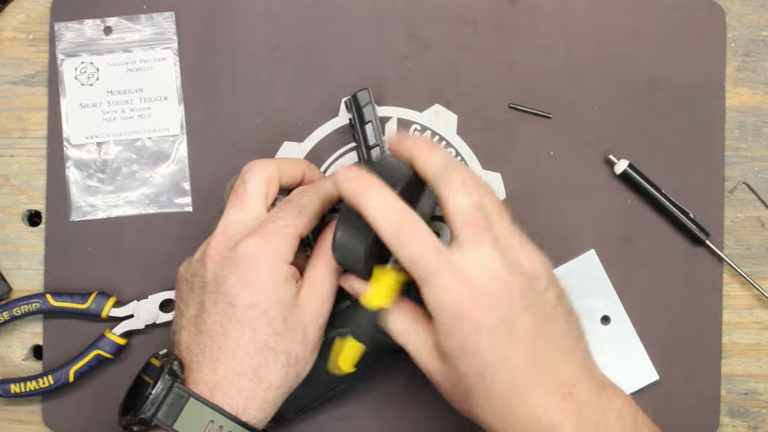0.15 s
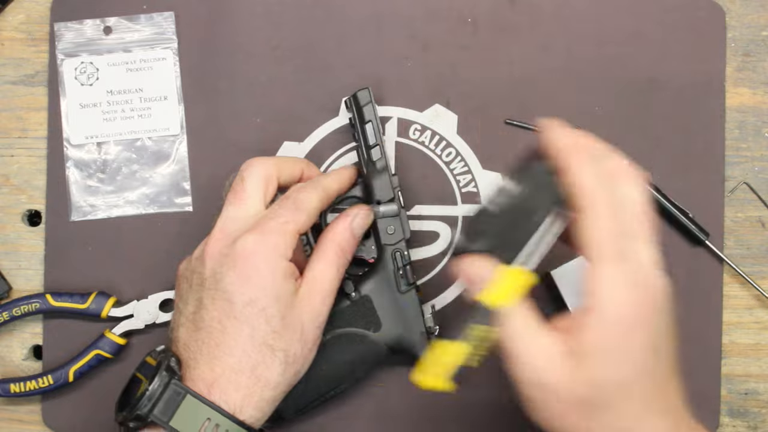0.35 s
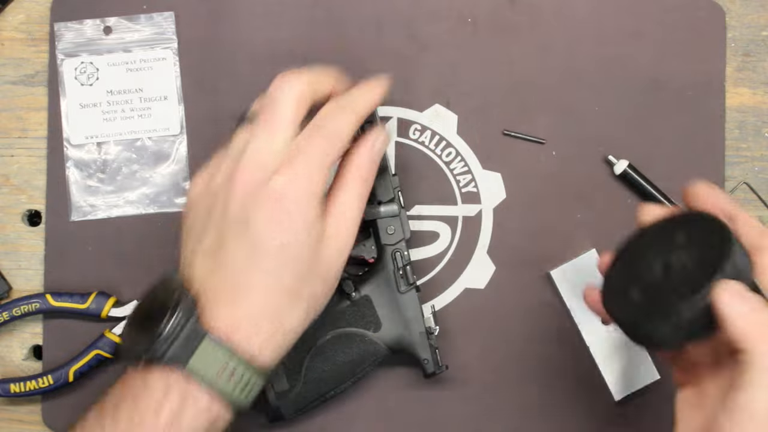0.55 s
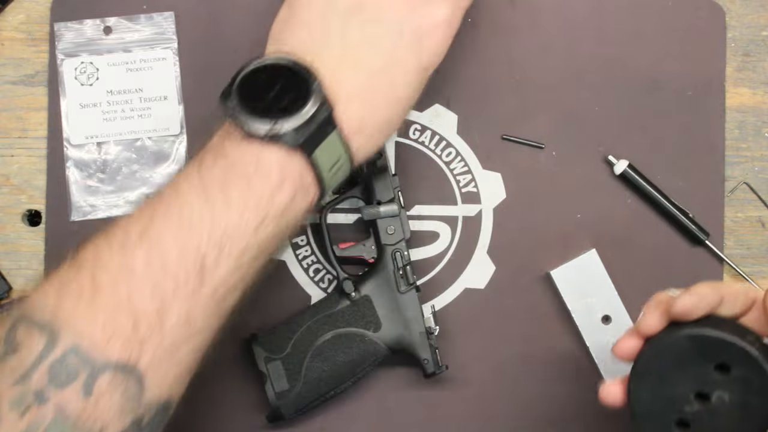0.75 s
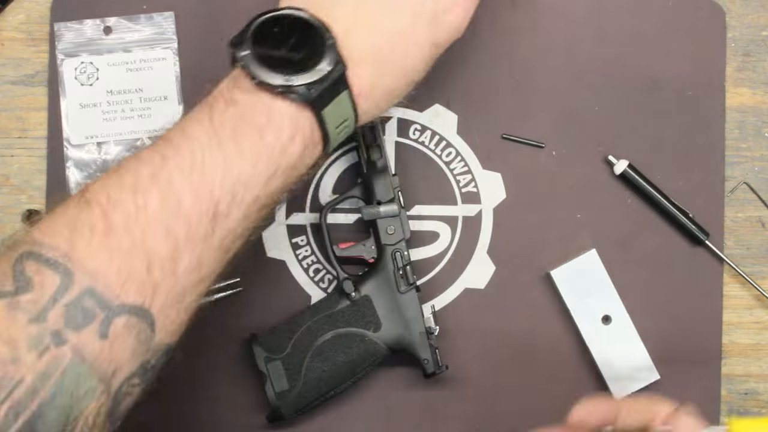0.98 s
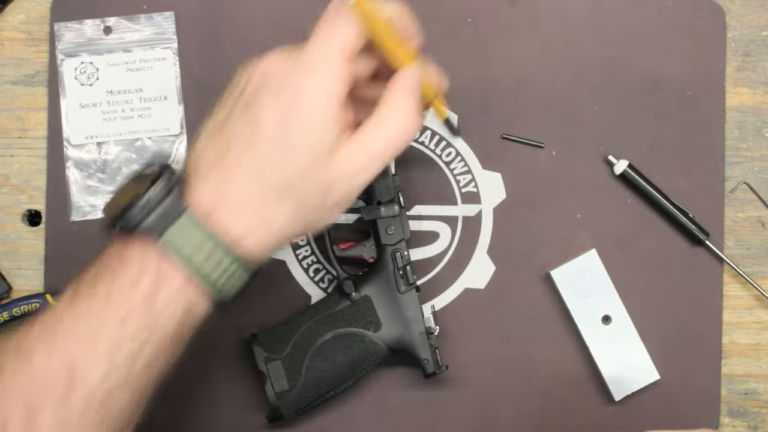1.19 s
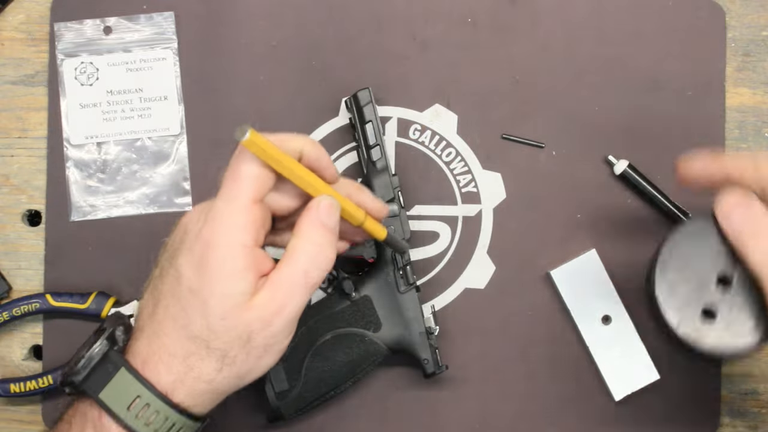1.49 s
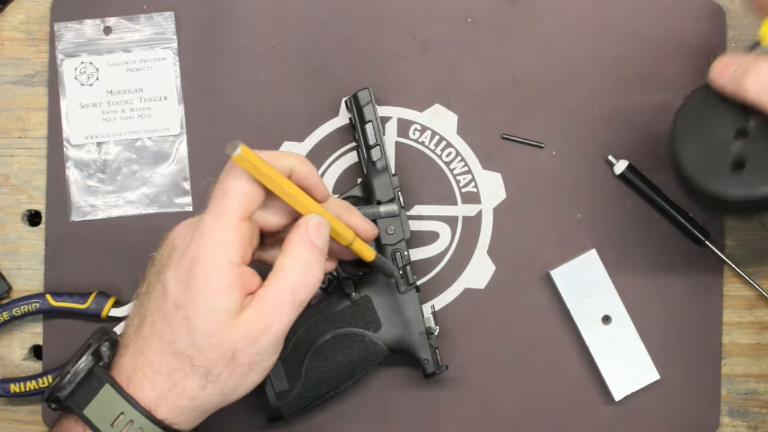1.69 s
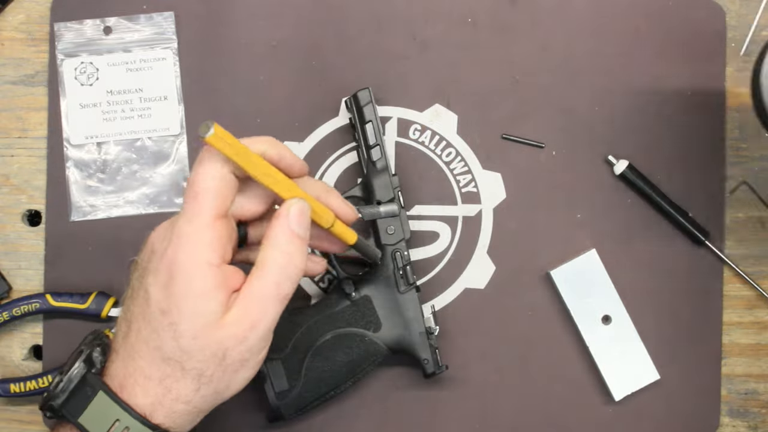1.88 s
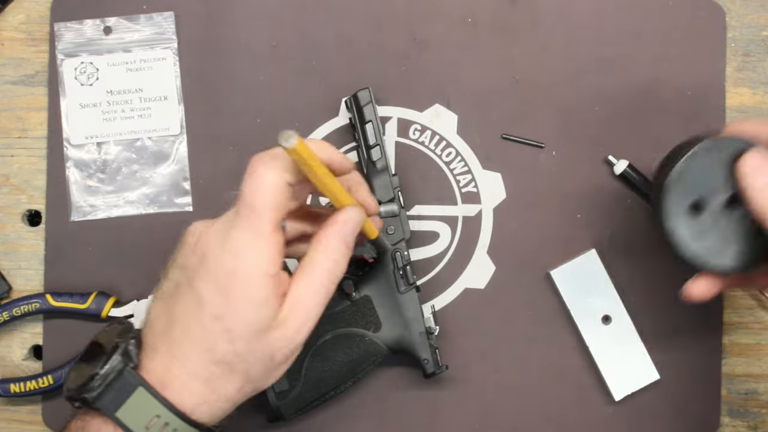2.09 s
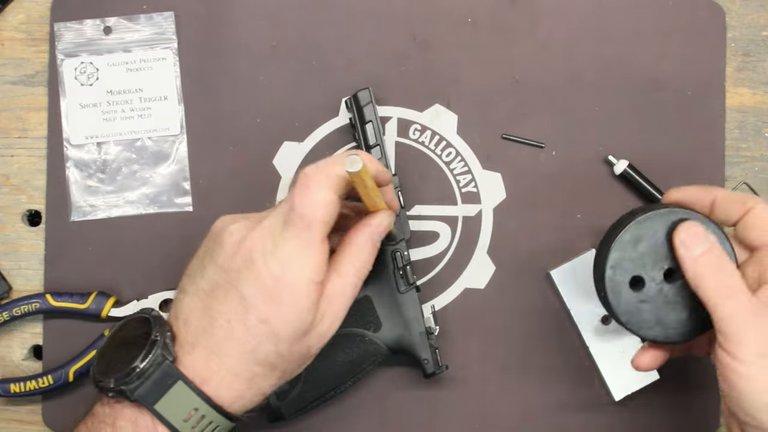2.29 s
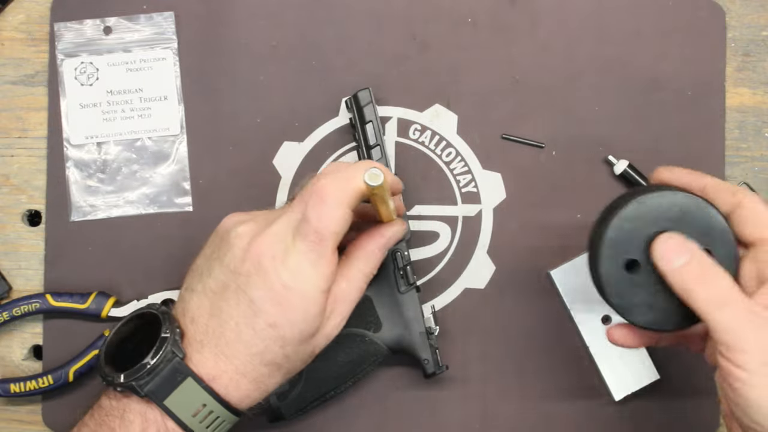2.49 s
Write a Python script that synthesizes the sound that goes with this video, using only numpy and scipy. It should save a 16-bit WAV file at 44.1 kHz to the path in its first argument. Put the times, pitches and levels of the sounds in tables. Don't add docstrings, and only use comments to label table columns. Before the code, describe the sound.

Tapping on a steel pin with a hard puck, close in a small room with faint fan hum. An earlier blow dies away at 0 s; a loud, clipped knock hits at 0.25, followed by ticks and light clinks near 0.5. A forearm rubs and a tool scrapes around 0.9-1.3. Soft thuds come at 1.75, the puck lands hard at 1.94, bounces at 2.08, 2.2 and 2.34, then steel clinks sharply at 2.39.

```python
import sys
import numpy as np
from scipy import signal
from scipy.fft import rfft, irfft
from scipy.io import wavfile
from scipy.ndimage import uniform_filter1d, map_coordinates

SR = 44100
rng = np.random.default_rng(int(sys.argv[2]) if len(sys.argv) > 2 else 0)


def gain_from_db(level_db):
    decades = np.asarray(level_db, float) / 20
    return 10 ** decades


def store_wav(level_fs):
    pcm = np.round(np.clip(np.atleast_2d(level_fs), -1, 1) * 32767)
    wavfile.write(sys.argv[1], SR, pcm.T.astype(np.int16))


N = 116865

# start_s, peak_db
TAPS = [
    (-.11, 12.5),
    (0.2461, 13),
]
LAST_TAP_S = TAPS[1][0]
LANDING_S = 1.9427
AIR_TOP_HZ = 15800


def unit(x):
    return x / np.sqrt(np.mean(x ** 2) + 1e-20)


def along(points, hz):
    point_hz, value = np.transpose(points)
    return np.interp(np.log(hz + 1), np.log(point_hz + 1), value)


def curve(rows):
    time_s, level_db = np.transpose(rows)
    return gain_from_db(np.interp(np.arange(N) / SR, time_s, level_db))


def wobble(rate_hz):
    return map_coordinates(rng.standard_normal(N // 64), [np.arange(N) * rate_hz / SR])


def noise(colour, size, tilt_db=0, peaks=()):
    tilt_floor_hz = 400
    hz = np.fft.rfftfreq(size, 1 / SR)
    level_db = along(colour, hz)
    level_db = level_db + tilt_db * np.log2(np.maximum(hz, tilt_floor_hz) / 2000) / 2
    for peak_hz, width_hz, boost_db in peaks:
        level_db = level_db + boost_db / (1 + ((hz - peak_hz) / width_hz) ** 2)
    spectrum = rfft(rng.standard_normal(size)) * gain_from_db(level_db) * (hz < AIR_TOP_HZ)
    return unit(irfft(spectrum, size))


def add(out, start_s, x):
    i = round(start_s * SR)
    x = x[max(-i, 0):][:N - max(i, 0)]
    out[max(i, 0):][:len(x)] += x


def blow(colour, dies, tilt_db, room_db, rise_s, peaks=(), crack_db=-90):
    # pitch_hz, t60_s
    room_dies = [(100, 0.52), (500, 0.39), (2000, 0.39), (6000, 0.29), (14000, 0.23)]
    # pitch_hz, level_db_per_hz
    crack_colour = [(200, -34), (2000, -26), (15500, 13)]
    crack_t60_s = 0.002
    t = np.arange(1 << 15) / SR
    source = noise(colour, size=len(t), tilt_db=tilt_db, peaks=peaks)
    hz, frame_s, z = signal.stft(source, SR, nperseg=128, noverlap=96)
    body_fade = gain_from_db(-60 * frame_s / along(dies, hz)[:, None])
    room_fade = gain_from_db(room_db - 60 * frame_s / along(room_dies, hz)[:, None])
    body = signal.istft(z * (body_fade + room_fade), SR, nperseg=128, noverlap=96)[1][:len(t)]
    crack = noise(crack_colour, size=len(t), tilt_db=2 * tilt_db)
    return body * (1 - np.exp(-t / rise_s)) + gain_from_db(crack_db - 60 * t / crack_t60_s) * crack


def ring(modes, length_s, rough_hz=0):
    t = np.arange(round(length_s * SR)) / SR
    out = np.zeros(len(t))
    for pitch_hz, level_db, t60_s in modes:
        steps = uniform_filter1d(rng.standard_normal(len(t)), size=96)
        steps = uniform_filter1d(steps, size=96)
        walk = np.cumsum(steps) * np.sqrt(rough_hz / (2 * np.pi * SR))
        out += gain_from_db(level_db - 60 * t / t60_s) * np.sin(2 * np.pi * (pitch_hz * t + walk))
    return out


def background():
    # pitch_hz, level_db_per_hz
    air_colour = [(15, -47), (25, -12), (101, -10), (221, -28), (322, -4.5), (421, -13.5), (1110, -16.5),
                  (1380, -17), (15500, -37)]
    # pitch_hz, width_hz, level_db
    fan = [(177, 44, -51), (350, 230, -53), (1137, 114, -51), (9920, 230, -63)]
    # time_s, gain_db
    gain_rows = [(0, -3), (.2, -1), (.3, -0.5), (.6, -6), (.75, -4), (1.08, 0.5), (1.9, -1.5), (2.0, -2.5),
                 (2.3, -1), (2.45, -1.5), (2.58, -1), (2.65, 0)]
    air_db, whine_hz, whine_db = -42.5, 9959, -59
    treble_hz, treble_ducks = 3000, 4
    hz, hum, gain = np.fft.rfftfreq(N, 1 / SR), np.zeros(N), curve(gain_rows)
    for pitch_hz, width_hz, level_db in fan:
        band = np.exp(-((hz - pitch_hz) / width_hz) ** 2)
        hum += gain_from_db(level_db) * unit(irfft(rfft(rng.standard_normal(N)) * band, N))
    whine = gain_from_db(whine_db + 2.0 * wobble(15)) * np.sin(2 * np.pi * whine_hz * np.arange(N) / SR)
    air = rfft(gain_from_db(air_db - 1.5 + 0.072 * wobble(8.0)) * noise(air_colour, size=N))
    air = air * (hz < AIR_TOP_HZ) / (1 + (40 / (hz + 1)) ** 4)
    treble = 1 / (1 + (treble_hz / (hz + 1)) ** 2)
    low = irfft(air * (1 - treble), N) + hum
    high = irfft(air * treble, N) + whine
    return gain * low + gain ** treble_ducks * high


def sleeve():
    # time_s, level_db
    speed = [(1.065, -80), (1.08, -45), (1.2, -50.5), (1.275, -54), (1.31, -74)]
    # pitch_hz, level_db_per_hz
    colour = [(4000, -20), (10000, 3), (15500, -7)]
    return curve(speed) * noise(colour, size=N)


def forearm_slide():
    # time_s, level_db
    speed = [(.6, -65.5), (.69, -50), (.9, -46.5), (1.055, -61), (1.075, -38.5), (1.19, -45.5),
             (1.25, -37.5), (1.3, -47.5), (1.36, -45), (1.6, -52.5), (1.9, -53), (2.1, -72)]
    # pitch_hz, level_db_per_hz
    colour = [(880, -17), (1500, -4), (2440, -3.5), (3250, -0.5), (4610, -3.5), (9700, -8.5),
              (15500, -17.5)]
    lumps = gain_from_db(1 * wobble(40.46))
    return curve(speed) * unit(lumps * noise(colour, size=N))


def tool_scrape():
    # time_s, level_db
    pressure = [(.91, -59), (.95, -30.5), (1.0, -30), (1.05, -40), (1.12, -37), (1.2, -100)]
    # pitch_hz, level_db_per_hz
    colour = [(47, -33), (80, -26), (119, -9), (485, -1), (693, -5.5), (1270, -9), (12000, -33.5),
              (15600, -67), (22000, -120)]
    lumps = gain_from_db(2.7 * wobble(69.84))
    return curve(pressure) * unit(lumps * noise(colour, size=N))


def squeak():
    # time_s, pitch_hz, level_db
    glide = [(.8, 10000, -80), (.84, 10000, -58), (.91, 10600, -55), (.945, 10350, -56), (1.01, 10300, -80)]
    time_s, hz, level_db = np.transpose(glide)
    pitch_hz = np.interp(np.arange(N) / SR, time_s, hz) + 30 * wobble(60)
    return curve(np.transpose([time_s, level_db])) * np.sin(2 * np.pi * np.cumsum(pitch_hz) / SR)


def stand_sways():
    # start_s, level_db
    thumps = [(0.849, -35), (0.951, -26), (1.75, -21), (2.09, -62), (2.411, -30)]
    stand_hz, t60_s, rise_s = 55.5, .2, 0.0084
    out, t = np.zeros(N), np.arange(SR // 2) / SR
    sway = (1 - np.exp(-t / rise_s)) * np.sin(2 * np.pi * stand_hz * t)
    for start_s, level_db in thumps:
        add(out, start_s, gain_from_db(level_db - 60 * t / t60_s) * sway)
    return out


def ticks():
    # start_s, peak_db, brightness_db
    contacts = [(.018, -45, 5), (.069, -43, 5), (0.097, -33, -10), (.138, -44, 8), (.195, -33, 7),
                (.228, -47, 8), (.236, -44, 0), (.2645, -24, 0), (.287, -29, 0), (.312, -18, 6),
                (.62, -39, 6), (.897, -34, -3), (.956, -27, -12), (.987, -32, -8), (1.012, -42, 12),
                (1.026, -27, 17), (1.555, -29, -3), (1.7385, -19, -43), (1.786, -27, -40),
                (1.931, -14, -27), (2.1014, -42, 5), (2.242, -27, 3), (2.2655, -20, 11), (2.598, -30, -45)]
    # pitch_hz, level_db_per_hz
    colour = [(1500, -32), (5000, 11), (9000, 2), (14000, -4)]
    out = np.zeros(N)
    for start_s, peak_db, bright_db in contacts:
        add(out, start_s, gain_from_db(peak_db - 11.5) * blow(colour, [(8000, 0.02)], bright_db, -58, 0.00021))
    return out


def thuds():
    # start_s, peak_db, pitch_hz
    contacts = [(.405, -22.5, 350), (.948, -36, 494), (0.965, -32, 440), (0.986, -23, 505),
                (1.0255, -15, 360), (1.0269, -19.5, 743), (1.044, -23, 450), (1.740, -11.5, 240.6),
                (1.762, -17.5, 262), (1.805, -28.5, 340), (1.931, -16.5, 206), (2.102, -13.5, 348)]
    # pitch_hz, level_db_per_hz
    colour = [(35, -51), (60, -30), (181, -3.5), (257, 0), (606, -15), (842, -29), (1080, -22.5),
              (8000, -50), (10400, -74), (17600, -120)]
    # pitch_hz, t60_s
    dies = [(100, 0.08), (500, 0.19), (4000, 0.012)]
    note_t60_s, note_db = 0.077, -2.5
    out = np.zeros(N)
    for start_s, peak_db, pitch_hz in contacts:
        add(out, start_s, gain_from_db(peak_db - 12) * blow(colour, dies, 3.7, -9, 0.00076, crack_db=-28))
        add(out, start_s, ring([(pitch_hz, peak_db + note_db, note_t60_s)], .5))
    return out


def clinks():
    # start_s, peak_db, brightness_db, mode_1_hz, mode_2_hz
    touches = [(0.468, -28, 0, 3400, 3900), (0.475, -20.5, 11, 7500, 4180), (.479, -23, 0, 3400, 7100),
               (0.4977, -21, 0, 3480, 8510), (.503, -38, 1, 3440, 8800), (1.067, -22, -11.5, 1945, 7100),
               (1.078, -21.5, 1, 6600, 2940), (1.9549, -11.5, 1, 6400, 8300),
               (2.2188, -11.5, -5, 4170, 7360), (2.3632, -5.5, -11.5, 2555, 4690),
               (2.368, -10, -18, 2300, 3900), (2.392, 5.5, 3, 3280, 1443)]
    # pitch_hz, level_db_per_hz
    colour = [(100, -59), (900, -12), (1500, -3), (3300, 2), (7000, -5), (15500, -21.5)]
    # pitch_hz, width_hz, boost_db
    steel = [(1354, 61, 1.5), (5170, 110, -5), (8700, 270, 5.5)]
    # pitch_hz, t60_s
    dies = [(1000, 0.041), (4000, 0.017), (12000, 0.009)]
    # pitch_hz, level_db, t60_s
    bar = [(2930, -22, 0.15), (3270, -15, 0.22), (3420, -17, 0.3), (3600, -21, 0.3), (4880, -28, 0.35),
           (5900, -28, 0.28)]
    main_width_hz, main_boost_db = 250, 7
    main_ring_db, main_t60_s = -9.5, 0.031
    out = np.zeros(N)
    for start_s, peak_db, bright_db, *modes_hz in touches:
        peaks = steel + [(hz, main_width_hz * hz / 3500, main_boost_db) for hz in modes_hz]
        knock = blow(colour, dies, bright_db, -21.5, 0.000067, peaks, crack_db=-23)
        add(out, start_s, gain_from_db(peak_db - 4.5) * knock)
        notes = [(hz, min(peak_db, 0) + main_ring_db, main_t60_s) for hz in modes_hz]
        add(out, start_s, ring(notes, .1, rough_hz=150))
    add(out, touches[-1][0], ring(bar, .5, rough_hz=109))
    return out


def afterring():
    # pitch_hz, level_db, t60_s
    bench_low = [(205.9, -9.5, 0.27), (261, -10, 0.19)]
    # pitch_hz, level_db, t60_s
    rattle = [(6600, -46, .25), (8200, -44, .2), (12400, -46, .18), (14500, -50, .15)]
    # pitch_hz, level_db, t60_s
    landing_ring = [(1088, -9, 0.26), (1162, -12, 0.21), (1473, -16, 0.22), (2016, -12, 0.15)]
    rattle_s, nudge_s = 0.31, 1.026
    out = np.zeros(N)
    add(out, LAST_TAP_S, ring(bench_low, .5, rough_hz=12))
    shiver = gain_from_db(5.8 * wobble(40)[:round(.4 * SR)])
    add(out, rattle_s, ring(rattle, .4, rough_hz=700) * shiver)
    add(out, LANDING_S, ring(landing_ring, .5, rough_hz=25.3))
    add(out, nudge_s, ring([(4850, -50, .5)], 0.052))
    return out


def puck():
    # pitch_hz, level_db_per_hz
    landing_colour = [(35, -58), (60, -18), (253, -4), (738, -0.5), (889, -10), (1070, -3.5), (2840, -10.5),
                      (15500, -51)]
    # pitch_hz, width_hz, boost_db
    landing_peaks = [(280, 28, 7), (1190, 26, 3), (1930, 640, 4), (2840, 120, 4), (6140, 300, 1),
                     (8300, 360, 10.5)]
    # pitch_hz, t60_s
    landing_dies = [(100, 0.021), (1500, 0.031), (12000, 0.021)]
    # start_s, peak_db, hardness_db
    drops = [
        (2.0759, 2.5, -2),
        (2.1980, 0.5, -2.5),
        (2.263, -10.5, -16),
        (2.269, -9.5, -24),
        (2.276, -10.5, -19),
        (2.28, -14, -21),
        (2.3350, -5, -12.5),
        (2.35, -11.5, -23),
        (2.382, -12.5, -16),
    ]
    # pitch_hz, level_db_per_hz
    colour = [(35, -43), (60, -19.5), (351, -3), (829, -12.5), (1200, -3.5), (1670, -11), (2050, -24),
              (4030, -29), (15500, -52.5)]
    # pitch_hz, width_hz, boost_db
    peaks = [(324, 110, -2.5), (1250, 250, 1.5), (2370, 210, 13.5), (3900, 150, 12.5), (6240, 880, 7)]
    # pitch_hz, t60_s
    dies = [(100, 0.038), (1000, 0.051), (4000, 0.041), (12000, 0.025)]
    # pitch_hz, level_db, t60_s
    modes = [(323.2, -12.5, 0.4), (1102, -7, 0.19), (1181, -8.5, 0.16), (1467, -8, 0.094),
             (1750, -45, 0.087)]
    landing_db, rise_s, low_hz = 11.5, .0005, 111
    out = np.zeros(N)
    landing = blow(landing_colour, landing_dies, 0, -21.5, 0.00031, landing_peaks, crack_db=-4)
    add(out, LANDING_S, gain_from_db(landing_db) * landing)
    for start_s, peak_db, hard_db in drops:
        knock = blow(colour, dies, hard_db, -7.5, rise_s, peaks, crack_db=-32)
        add(out, start_s, gain_from_db(peak_db - 9.5) * knock)
        add(out, start_s, gain_from_db(peak_db - 10.0) * ring(modes, 0.39, rough_hz=24.4))
    return signal.sosfilt(signal.butter(2, low_hz, 'high', fs=SR, output='sos'), out)


def taps():
    # pitch_hz, level_db_per_hz
    colour = [(35, -39), (60, -16), (259, -0.5), (464, -3), (1150, -11.5), (1450, -14.5), (1670, -16.5),
              (7540, -35), (15500, -52.5)]
    # pitch_hz, t60_s
    dies = [(100, 0.1), (500, 0.066), (3000, 0.046), (12000, 0.033)]
    # pitch_hz, width_hz, boost_db
    frame = [(490, 58, 4.5), (4550, 100, 4.5), (7060, 220, -3), (11700, 310, 7)]
    # pitch_hz, level_db, t60_s
    pin = [(2099, -48, 2.5), (4635, -62, 2), (4846, -55, 2.5), (4849.2, -56, 2.5), (7526, -64, .8),
           (9453, -52, 1.4), (10185, -49, .9), (14050, -66, .3)]
    # pitch_hz, level_db, t60_s
    pin_after = [(1346, -42, 1.8), (4850, -53, 2.5), (4635, -62, 2.5)]
    # pitch_hz, level_db, t60_s
    bench = [(336, -4, 0.22), (439, 2, 0.26), (535.3, -1.5, 0.43), (572, -8, 0.097), (843, -14, 0.43),
             (1044, -6, 0.43), (1135, -3, 0.36), (1196, -0.5, 0.13)]
    bench_db = -14.5
    out = np.zeros(N)
    for start_s, peak_db in TAPS:
        knock = blow(colour, dies, 5.6, -15.0, 0.000068, frame, crack_db=-26)
        add(out, start_s, gain_from_db(peak_db - 5.5) * knock)
    add(out, 0, ring(pin, LAST_TAP_S))
    add(out, LAST_TAP_S, ring(pin_after, 0.74))
    add(out, LAST_TAP_S, gain_from_db(bench_db) * ring(bench, .5, rough_hz=11.5))
    return out


def scene():
    rubs = sleeve() + forearm_slide() + tool_scrape() + squeak()
    contacts = stand_sways() + ticks() + thuds() + clinks()
    return (background() + rubs + contacts + afterring() + puck() + taps())[None]


def band_limit(x):
    return signal.sosfilt(signal.butter(12, 16660, fs=SR, output="sos"), x)


def record(dry):
    clip_hard, top_hz, top_edge_hz = 30, 16100, 150
    x = dry / (1 + np.abs(dry) ** clip_hard) ** (1 / clip_hard)
    hz = np.fft.rfftfreq(N, 1 / SR)
    lowpass = (1 - np.tanh((hz - top_hz) / top_edge_hz)) / 2
    x = irfft(rfft(x) * lowpass, N)
    return band_limit(np.clip(x, -1, 1))


dry = scene()
out = record(dry)
store_wav(out)
```